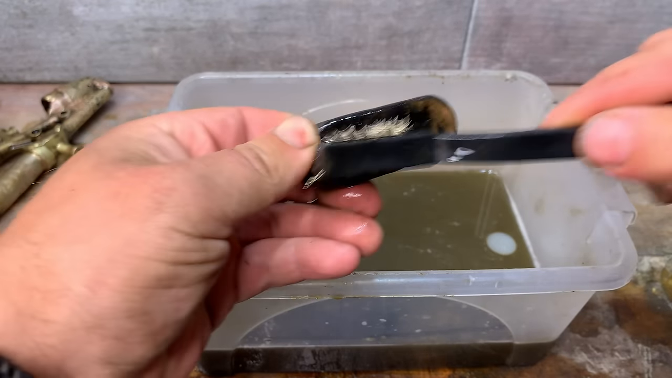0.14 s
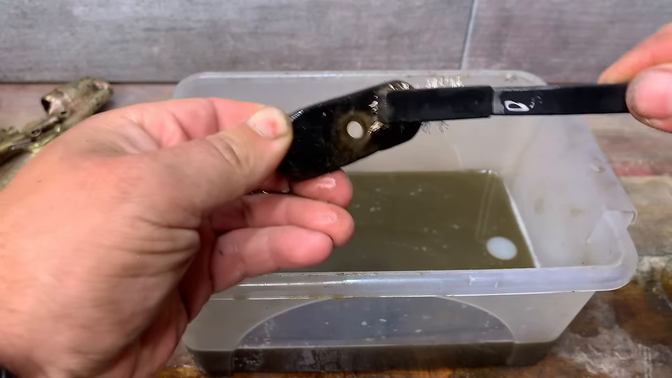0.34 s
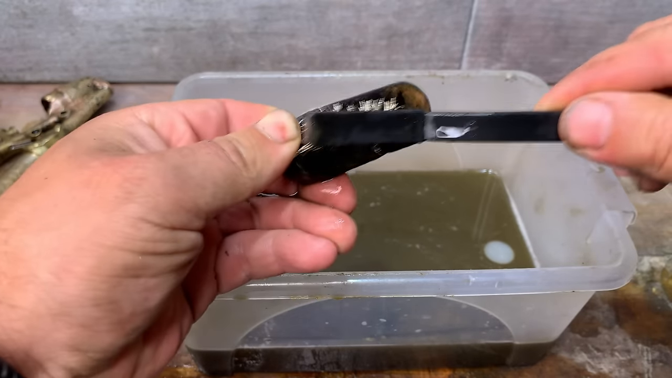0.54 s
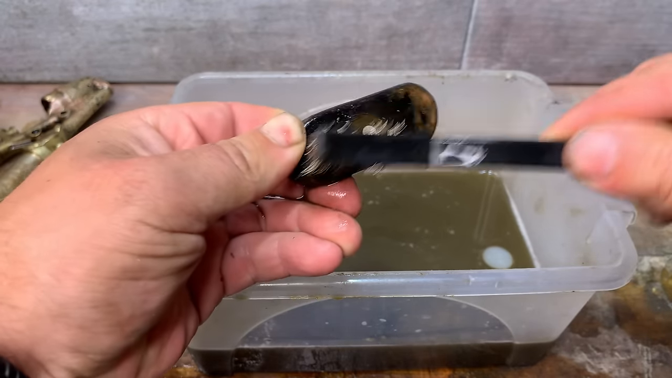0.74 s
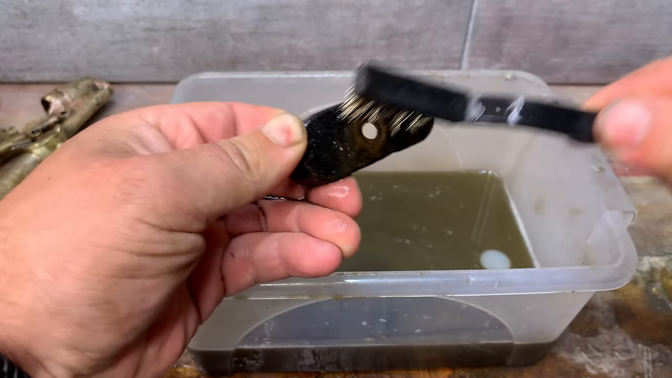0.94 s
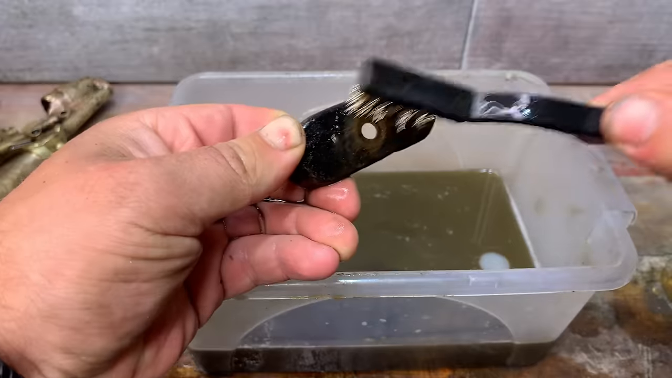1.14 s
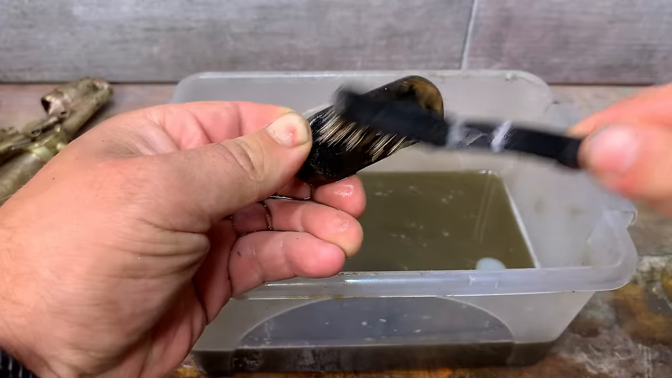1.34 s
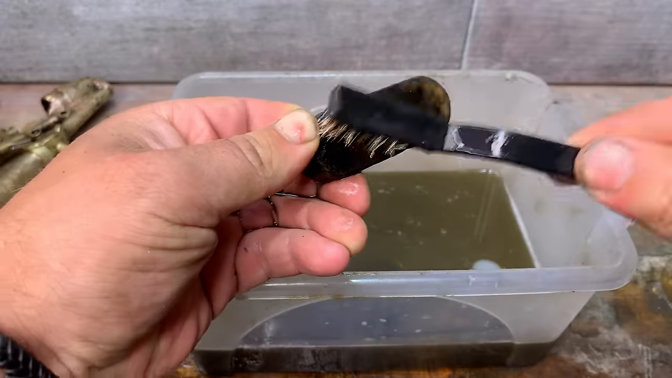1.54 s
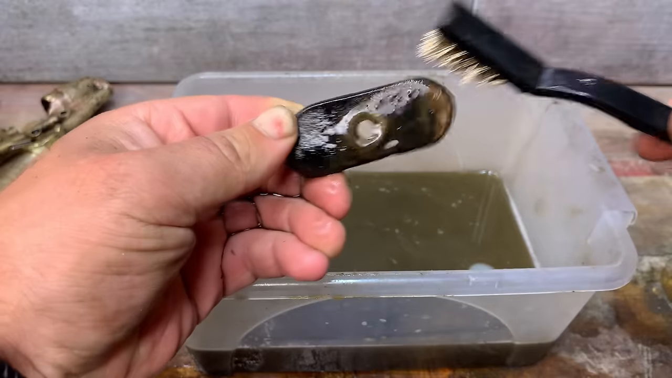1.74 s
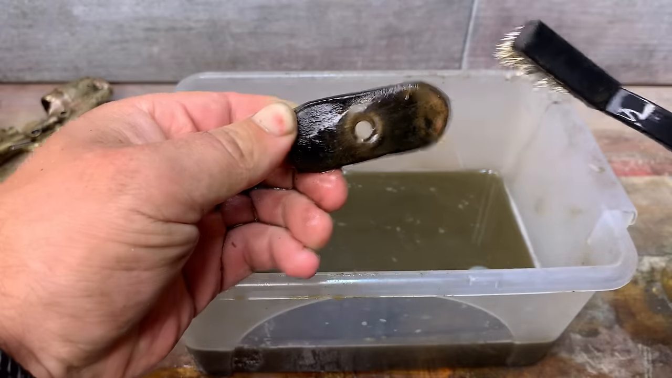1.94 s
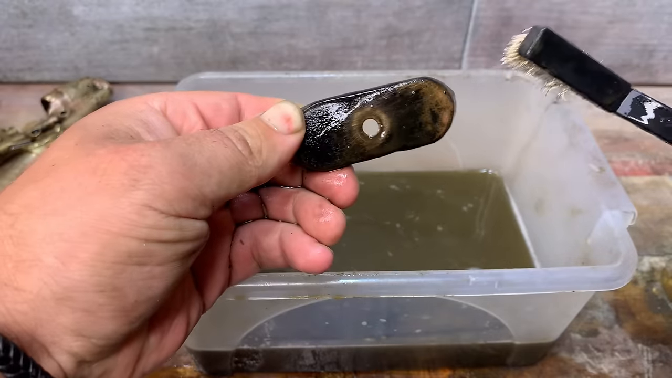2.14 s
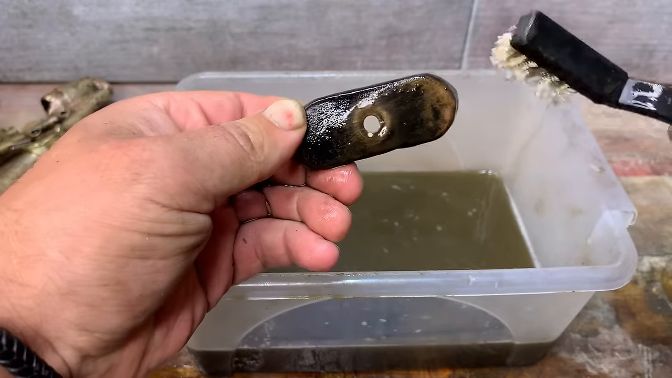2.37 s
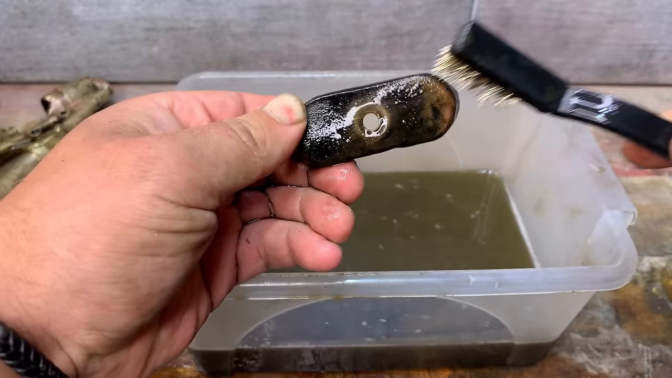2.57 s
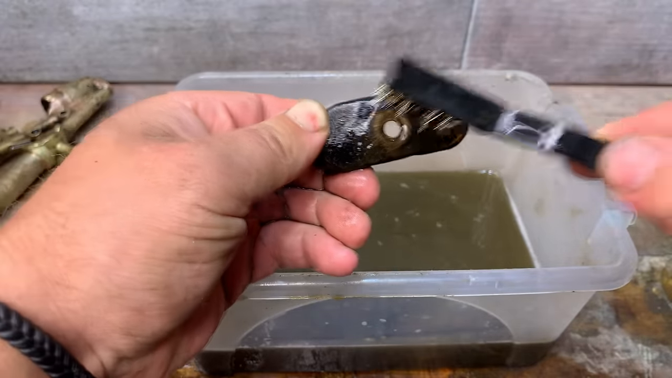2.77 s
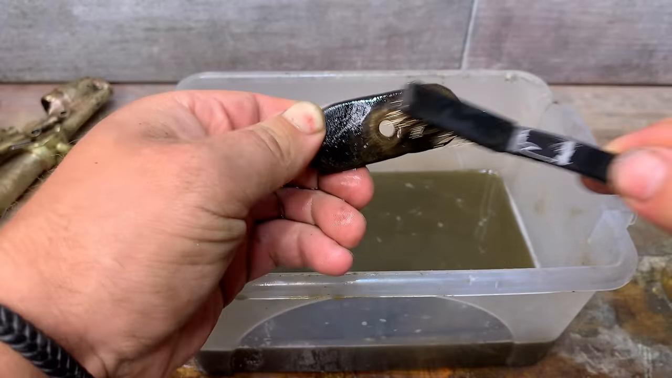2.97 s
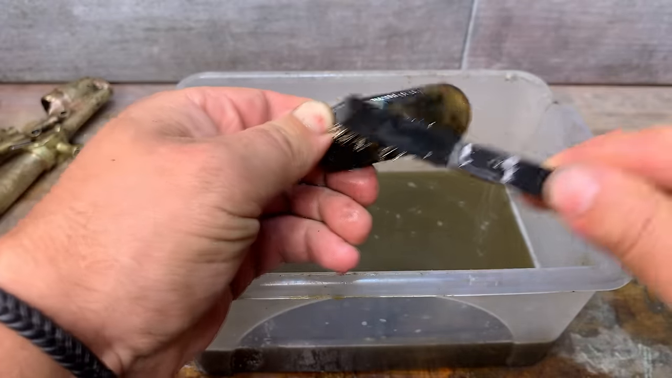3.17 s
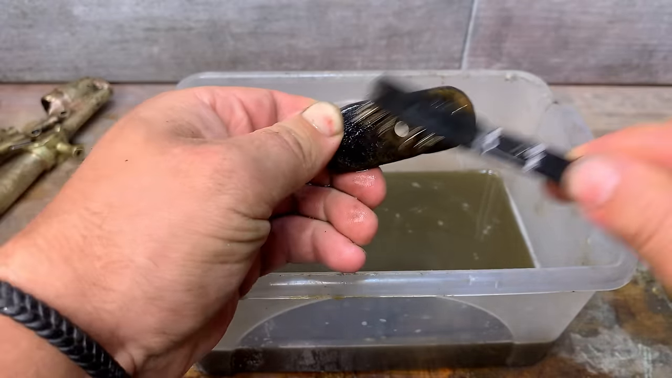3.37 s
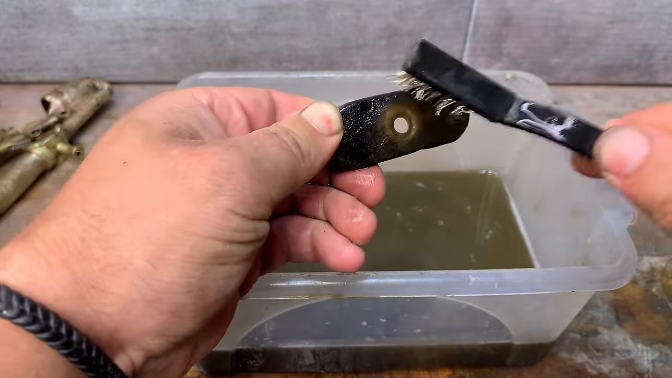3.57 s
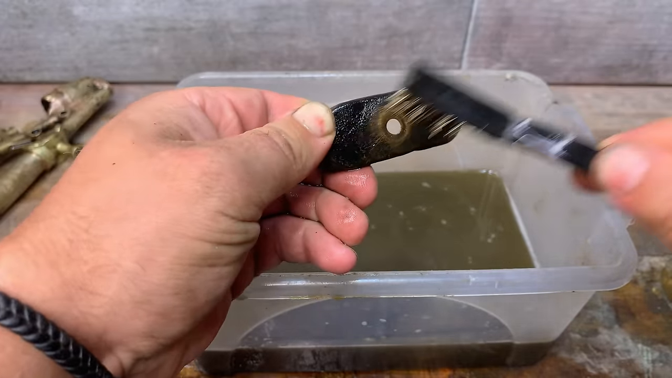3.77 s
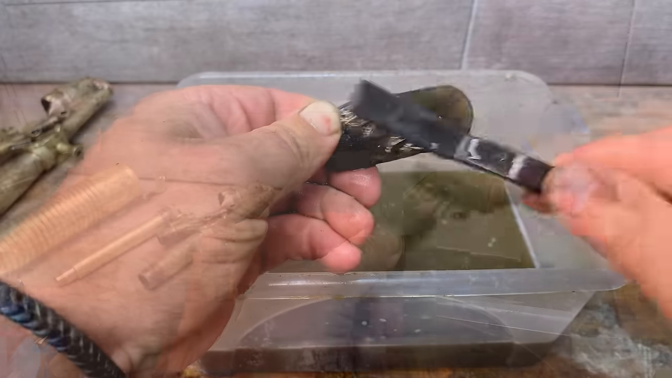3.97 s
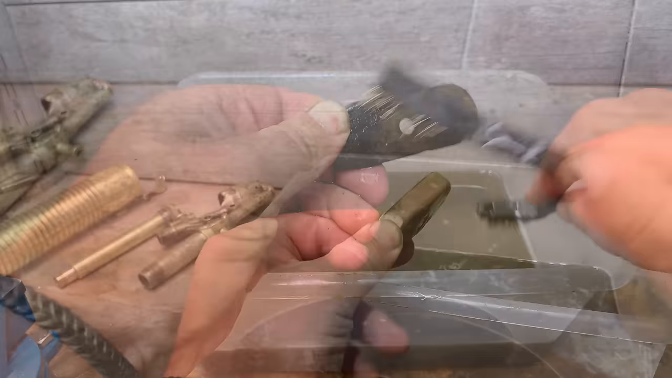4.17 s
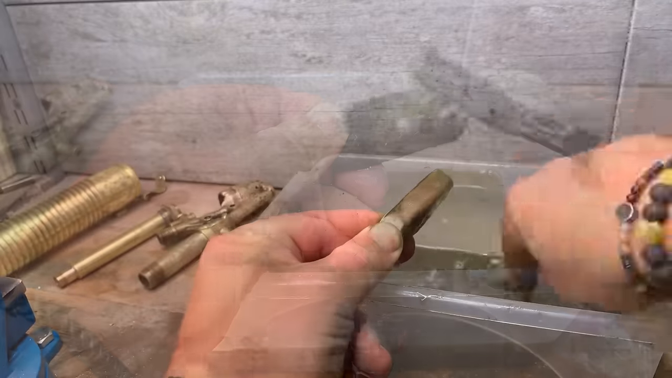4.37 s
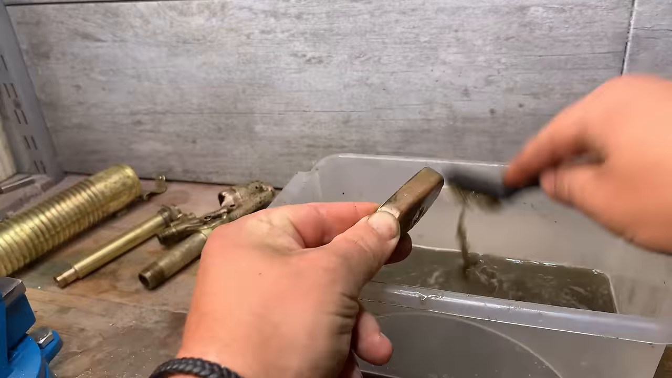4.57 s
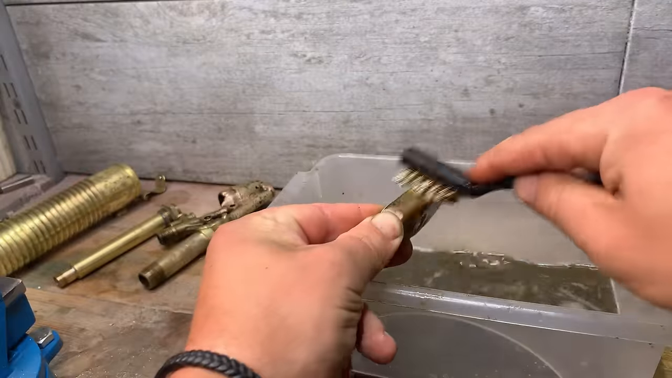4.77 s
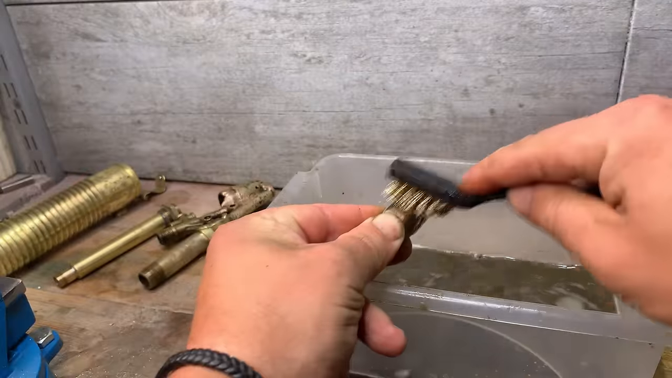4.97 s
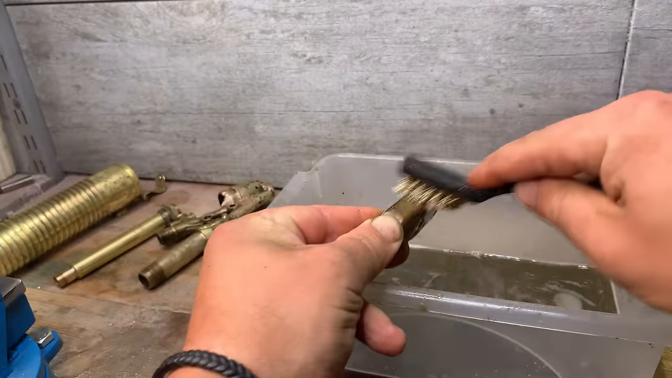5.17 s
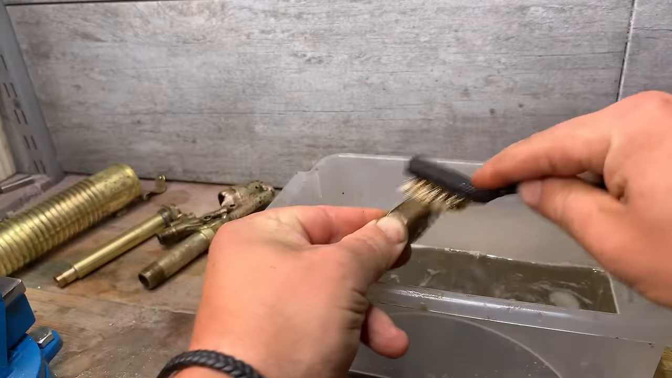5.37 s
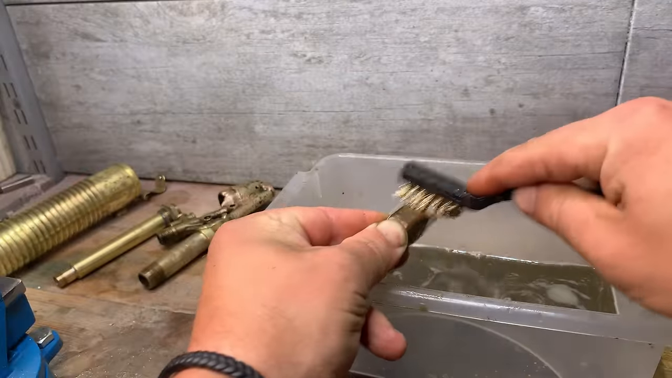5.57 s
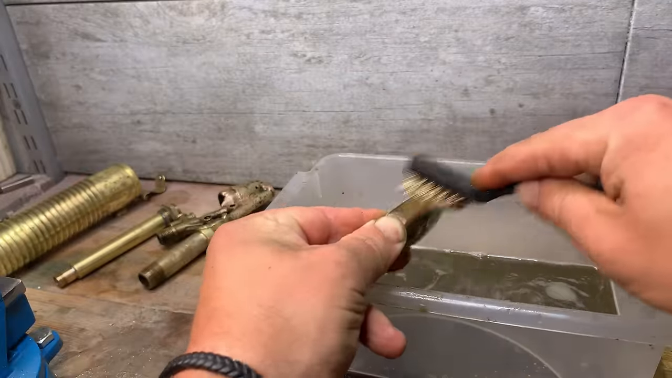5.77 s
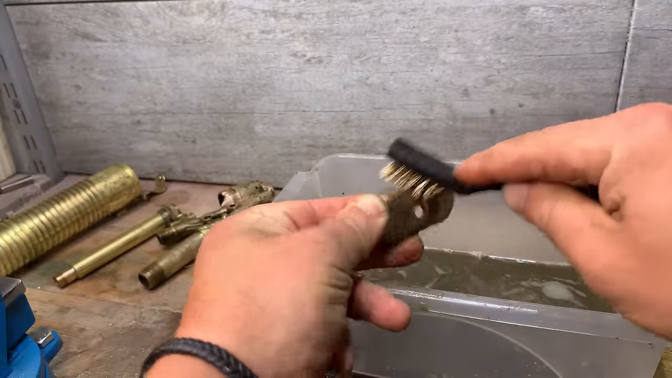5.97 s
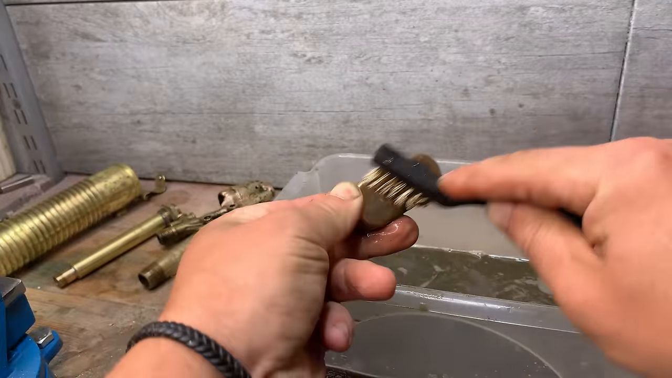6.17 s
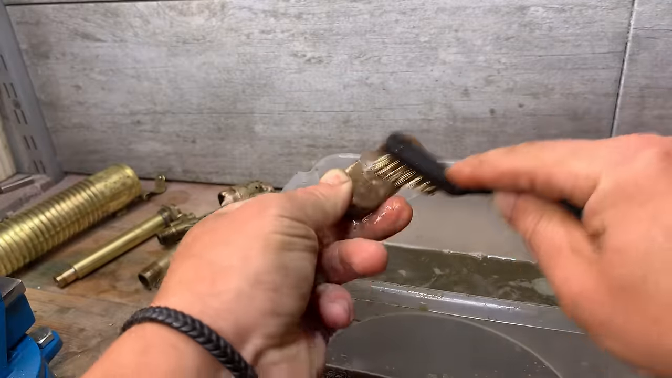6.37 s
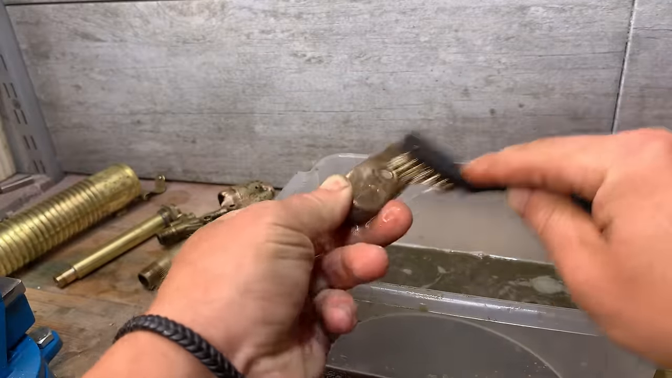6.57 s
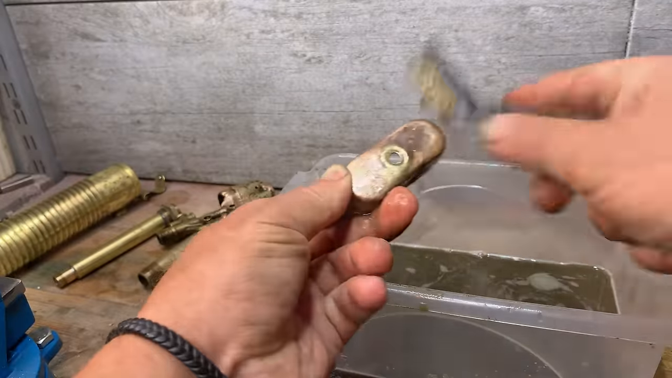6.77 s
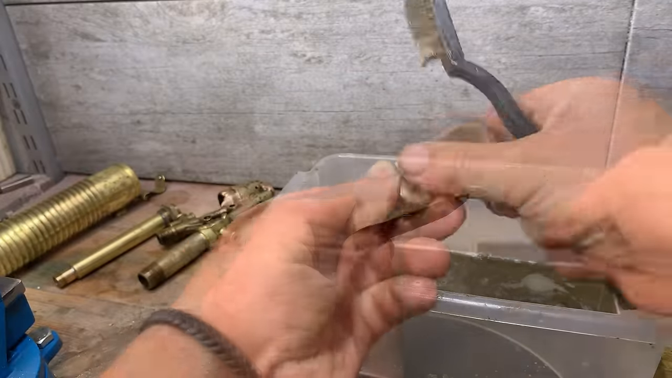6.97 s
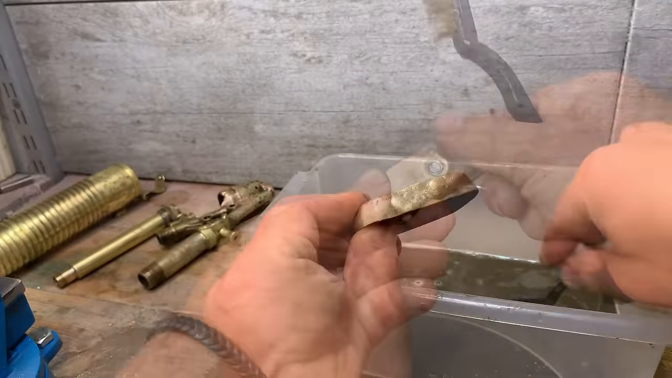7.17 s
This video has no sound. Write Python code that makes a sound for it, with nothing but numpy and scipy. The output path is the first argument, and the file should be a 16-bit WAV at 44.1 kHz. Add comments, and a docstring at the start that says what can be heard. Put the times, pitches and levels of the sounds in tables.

```python
"""Wire brush on a brass part

Close up in a quiet workshop, a small wire brush scrubs a hand-held brass part, first its face, then its end.
Noise of catching and flicking bristle tips, swelling with each stroke, rings the finger-damped brass modes.
Bumps ring a plastic tub in damped sines and set the bench rumbling; hands shuffle against it as filtered noise.
Something hollow is tapped twice, faint ticks fall, and air rushes softly; one close microphone, slightly wide."""
import sys
import numpy as np
from scipy import signal
from scipy.fft import rfft, irfft, next_fast_len
from scipy.io import wavfile
from scipy.ndimage import uniform_filter1d, map_coordinates

SR = 44100
rng = np.random.default_rng(int(sys.argv[2]) if len(sys.argv) > 2 else 0)


def int16_out(signal):
    """Quantize to a 16-bit WAV file."""
    q = np.round(np.clip(np.atleast_2d(signal).T, -1, 1) * 32767)
    wavfile.write(sys.argv[1], SR, q.astype(np.int16))


def invert_db(x):
    """Field ratio 10**(x/20) for x, a level in decibels (scalar or array-like)."""
    u = np.asarray(x, float) / 20
    return 10 ** u


N = 318291  # length in samples

# Rush of air, spectrum: freq_hz, level_db
AIR_SPECTRUM = [(25, -11.5), (84, -7.5), (206, -6), (300, -13), (6380, -23), (13000, -28.5), (15500, -37),
                (16000, -47.5)]
# Reverberation of the workshop: freq_hz, t60_s
SHOP_DECAY = [(200, .14), (3000, .2), (12000, .1)]
# Faint lone ticks: start_s, level_db, pitch_hz
TICKS = [(1.8756, -56, 2650), (1.906, -59, 2820), (2.3328, -54.5, 6350), (6.985, -54.5, 4650),
         (7.128, -51, 1380)]
# Hands and brush shuffling against the tub: time_s, level_db
SHUFFLE_LEVEL = [(4.2, -102), (4.37, -53.5), (4.5, -58), (4.65, -76.5), (4.93, -63), (5.15, -71.5),
                 (5.28, -61.5), (5.6, -57), (5.92, -72), (6.2, -83), (6.95, -72.5), (7.07, -63.5),
                 (7.2, -67)]
# Dry taps on something hollow nearby: start_s, level_db
TAPS = [(6.994, -29.5), (7.145, -30)]
# Modes of the hollow thing: pitch_hz, level_db (relative), t60_s
HOLLOW_MODES = [(162.6, -7.5, 0.15), (390, -0.5, 0.19), (520, -5, 0.08), (824, 4, 0.0765),
                (1116, -6.5, 0.13), (1540, -1.5, 0.055), (2460, -21, 0.036), (3140, -4, .025)]
# Bumps of the tub: start_s, level_db, sharpness_hz (higher for a harder contact)
BUMPS = [(4.059, -18, 1010), (4.353, -43, 500), (4.4, -28.5, 2000), (4.421, -29.5, 1540),
         (4.445, -39, 2530), (4.466, -40.5, 350), (4.517, -42.5, 1360), (4.695, -45, 4470),
         (5.234, -45, 400), (5.264, -49, 400), (5.367, -61, 400), (5.414, -45.5, 400), (5.508, -33, 577),
         (5.619, -36.5, 200), (5.679, -48.5, 397), (5.83, -27.5, 520), (6.623, -36, 450),
         (6.873, -46.5, 380)]
# Modes of the tub: pitch_hz, level_db (relative), t60_s
TUB_MODES = [(64.6, -8.5, 0.13), (101.4, -8.5, 0.13), (176, -5.5, 0.12), (247.4, -3.5, 0.057),
             (323.7, 2.5, 0.046), (384.3, -1, 0.077), (513, 6, 0.039), (782, 0, 0.04),
             (1180, -13.5, 0.0474), (1316, -8, 0.083), (1352, -2, 0.015)]
# Bench rumble, spectrum: freq_hz, level_db (relative)
BENCH_SPECTRUM = [(45, -50.5), (72, 2.5), (105, -2.5), (170, -13.5), (380, -9.5), (700, -30.5)]
# Bench rumble after a bump of -37 dB: sharpness_hz, level_db
RUMBLE_LEVEL = [(400, -50), (1500, -57.5), (4000, -64)]
# Brush strokes, each lasting to the next turn or lift:
# turn_s, fastest_s, fastest_level_db (relative), turn_level_db (relative)
STROKES = [(0.027, 0.134, -21.5, -67.5), (0.195, 0.264, -22, -44), (0.373, 0.486, -19.5, -37),
           (0.551, 0.602, -23, -42.5), (0.669, 0.724, -19, -43.5), (0.803, 0.845, -20.5, -41.5),
           (0.917, 1.005, -22, -40), (1.046, 1.134, -21.5, -39.5), (1.192, 1.277, -21.5, -40),
           (1.314, 1.379, -19, -45.5), (1.445, 1.545, -24, -37.5), (1.574, 1.63, -25.5, -45.5),
           (2.67, 2.705, -55, -62), (2.719, 2.74, -44.5, -56), (2.764, 2.83, -23.5, -48),
           (2.882, 2.957, -22, -35.5), (3.029, 3.124, -19, -36), (3.166, 3.241, -20, -43.5),
           (3.322, 3.395, -19.5, -38.5), (3.448, 3.503, -21.5, -46), (3.588, 3.649, -24, -44),
           (3.718, 3.765, -21.5, -30.5), (3.841, 3.922, -23.5, -37.5), (3.977, 4.052, -26.5, -34),
           (4.117, 4.198, -27.5, -45), (4.249, 4.333, -30, -39), (4.385, 4.432, -38, -50),
           (4.651, 4.664, -33.5, -48), (4.715, 4.733, -32, -54), (4.76, 4.802, -27.5, -45),
           (4.862, 4.899, -22, -39), (4.963, 5.024, -27, -42.5), (5.062, 5.121, -25, -39.5),
           (5.161, 5.205, -24, -37.5), (5.239, 5.302, -20, -39.5), (5.325, 5.411, -25, -39),
           (5.436, 5.496, -23, -37), (5.539, 5.565, -25.5, -39), (5.577, 5.62, -26.5, -30),
           (5.627, 5.709, -24.5, -42.5), (5.724, 5.794, -23, -43), (5.852, 5.889, -24, -35.5),
           (5.977, 6.028, -28, -40.5), (6.07, 6.113, -27, -46.5), (6.182, 6.227, -27, -42),
           (6.272, 6.342, -29.5, -39.5), (6.355, 6.412, -26.5, -43.5), (6.459, 6.506, -19, -38.5),
           (6.524, 6.614, -26.5, -34), (6.706, 6.792, -44.5, -66)]
# Moments when the brush leaves the brass: time_s
LIFTS = [1.774, 4.592, 6.698, 6.845]
# Tufts snapping off an edge: start_s, level_db (relative)
SNAPS = [(0.395, -10.5), (0.558, -18), (0.5811, -13), (0.8168, -7.5),  (1.5232, -9), (1.5813, -14),
         (1.742, -29.5), (2.6288, -51), (2.638, -51.5), (2.6442, -40.5), (2.6876, -24.5), (2.702, -33),
         (2.7254, -18.5), (2.738, -33), (2.7434, -18.5), (2.7565, -23), (2.7794, -26.5), (2.9066, -11.5),
         (2.931, -8.5), (3.665, -6.5), (4.661, -14), (4.7205, -18.5), (4.755, -24), (4.784, -20),
         (5.152, -13), (5.239, -19), (5.2616, -12), (5.463, -13), (5.6635, -10.5), (5.9485, -7),
         (6.4752, -27), (6.4935, -1.5), (6.662, -18), (6.786, -28), (6.821, -26)]
# Grip: time_s, fizz_db (tips over the ring of the brass), body_db (handle and hand over the ring),
# pull_loss_db (body lost on pull strokes)
GRIP = [(0.13, -6, 2, 7), (.4, -3.5, -2.5, 2), (1.599, -2, 7, 9), (2.701, 8.5, 27.5, -3),
        (2.83, -5, -1.5, 0.5), (3.5, -1, 1.5, 0.5), (4.3, -1.5, 5, 0), (4.74, -6.5, 9, 6),
        (4.82, 4, 9.5, 2.5), (5.2, 1, 6, -1), (6.1, 1.5, 16, 4), (6.32, 1.5, 3, -8), (6.5, 1, 8, 4)]
# How loosely the fingers let the brass ring: time_s, level_db (relative)
FINGER_FREEDOM = [(4.6, 4), (4.7, -5), (5.9, 0.5), (6.3, 0.5)]
# Scrape colour along the face and over the end: freq_hz, level_db (relative)
FACE_COLOUR = [(150, -36.5), (300, -34.5), (560, -41.5), (760, -29), (1000, -34.5), (1500, -34.5),
               (2100, -32.5), (2700, -25), (3700, -12.5), (5500, -12.5), (7000, -11.5), (9400, -9.5),
               (14000, -8.5), (16000, -7)]
END_COLOUR = [(200, -36.5), (370, -33.5), (600, -41), (1050, -39.5), (1330, -35.5), (2650, -27.5),
              (3600, -5.5), (5000, -7.5), (9000, -5.5), (14300, 1), (16000, -5.5)]
# Brass resonances fed along the face and over the end: pitch_hz, level_db (relative)
FACE_MODES = [(3880, -3), (4120, -2.5), (4270, -12), (4840, -7.5), (5450, -11.5), (6250, -14), (7890, -10),
              (8750, -10), (10400, -6.5), (11100, -10), (12600, -7.5), (13150, -7.5), (14100, -6)]
END_MODES = [(3630, -4.5), (4200, -4.5), (4950, -7), (6250, -10), (8520, -12), (10700, -12), (12600, -17.5),
             (14300, -18.5)]


def unit(x):
    """Scaled to rms 1."""
    return x / np.sqrt(np.mean(x ** 2) + 1e-20)


def along(points, hz):
    """Value at hz, read between (Hz, value) points on a log axis."""
    f, v = np.transpose(points)
    return np.interp(np.log(hz + 1), np.log(f + 1), v)


def curve(s, value):
    """One value per sample, in straight lines between the given times."""
    return np.interp(np.arange(N) / SR, np.maximum.accumulate(s), value)


def wobble(rate):
    """A smooth random curve with rate knots a second."""
    knots = rng.standard_normal(int(N * rate / SR) + 4)
    return map_coordinates(knots, [np.arange(N) * rate / SR])


def filtered(x, response):
    """The sound x shaped by a complex response of frequency."""
    m = next_fast_len(N + SR // 2)
    return irfft(rfft(x, m) * response(np.fft.rfftfreq(m, 1 / SR)), m)[..., :N]


def colour(spectrum):
    """Response of (Hz, dB) points, closing towards 5 Hz below the first."""
    return lambda hz: invert_db(along([(5, -90)] + spectrum, hz))


def resonance(hz, centre_hz, width_hz):
    """Response of one damped mode, 1 at its centre."""
    damping = 1j * hz * width_hz
    return damping / (centre_hz ** 2 - hz ** 2 + damping)


def air():
    """Faint steady rush: noise with the spectrum of the air."""
    return unit(filtered(rng.standard_normal(N), colour(AIR_SPECTRUM)))


def shop(x):
    """The room's answer: a noise tail in which each frequency dies at its own speed."""
    hz, t, z = signal.stft(rng.standard_normal(SR // 2), SR, nperseg=256)
    decay = invert_db(-60 * t / along(SHOP_DECAY, hz)[:, None])
    tail = signal.istft(z * decay, SR, nperseg=256)[1]
    delayed = np.pad(x, (200, 0))  # samples before the room answers
    return signal.fftconvolve(delayed, tail / np.linalg.norm(tail))[:N]


def ticks():
    """Each tick is a few damped cycles, roughened by noise."""
    out, t = np.zeros(N + SR), np.arange(SR // 20) / SR
    for s, db, hz in TICKS:
        rough = 1 + 0.65 * rng.standard_normal(len(t))
        tick = invert_db(db - 60 * t / 0.0098) * np.sin(2 * np.pi * hz * t) * rough
        out[round(s * SR):][:len(t)] += tick
    return out[:N]


def shuffle():
    """Soft, lumpy rubbing heard through the lower modes of the tub."""
    def walls(f):
        modes = sum(invert_db(db) * resonance(f, c, 3 / t60) for c, db, t60 in TUB_MODES)
        return modes / (1 + (f / 460) ** 6)

    lumpy = invert_db(3.5 * wobble(30)) * rng.standard_normal(N)
    rub = unit(filtered(lumpy, walls))
    return invert_db(curve(*np.transpose(SHUFFLE_LEVEL))) * rub


def taps():
    """A tap on something hollow: a dull noise crack and a short, fluttering ring of its modes."""
    crack_db, crack_t60_s, flutter_depth = -9, 0.03, 0.45
    out, t = np.zeros(N + SR), np.arange(SR // 3) / SR
    hz, mode_db, t60 = np.transpose(HOLLOW_MODES)[:, :, None]
    band = signal.butter(4, [400, 3500], "band", fs=SR)
    for s, db in TAPS:
        noise = rng.standard_normal((len(hz), len(t)))
        flutter = 1 + flutter_depth * unit(uniform_filter1d(noise, size=300))
        modes = flutter * invert_db(mode_db - 60 * t / t60) * np.sin(2 * np.pi * hz * t)
        ring = modes.sum(axis=0)
        crack = unit(signal.lfilter(*band, rng.standard_normal(len(t))))
        sound = ring / np.abs(ring).max() + crack * invert_db(crack_db - 60 * t / crack_t60_s)
        onset = 1 - np.exp(-t / 0.0013)
        out[round(s * SR):][:len(t)] += invert_db(db) * sound * onset
    return out[:N]


def tub():
    """Each bump cracks, rings the tub roughly and sets the bench rumbling; a soft contact has few highs."""
    out, after, t = np.zeros(N + SR), np.zeros(N + SR), np.arange(SR // 3) / SR
    hz, mode_db, t60 = np.transpose(TUB_MODES)[:, :, None]
    luck = rng.standard_normal((len(BUMPS), len(TUB_MODES), 2, 1)).transpose(0, 2, 1, 3)
    noise = rng.standard_normal((len(BUMPS), 2, len(t)))
    for (s, db, sharp_hz), (strength, detune), (dust, buzz) in zip(BUMPS, luck, noise):
        # a sharp tap barely moves the low modes
        contact = 1 / (1 + (hz / sharp_hz) ** 3) / (1 + (sharp_hz / hz / 7) ** 2)
        swing = np.sin(2 * np.pi * hz * (1 + 0.019 * detune) * t)
        modes = contact * invert_db(mode_db + 2 * strength - 60 * t / t60) * swing
        build_up = 1 - np.exp(-t * hz * 0.53)  # low modes take longer
        ring = (modes * build_up).sum(axis=0)
        band = signal.butter(4, [200, np.clip(1.36 * sharp_hz, 300, 9000)], "band", fs=SR)
        fade = invert_db(-12.5 - 60 * t / 0.014) + invert_db(-17.5 - 60 * t / 0.16)
        crack = unit(signal.lfilter(*band, dust)) * fade * (1 - np.exp(-t * sharp_hz))
        # loose walls flutter
        rattle = 1 + 0.49 * unit(uniform_filter1d(buzz, size=150)) * (1 - np.exp(-t / 0.0055))
        out[round(s * SR):][:len(t)] += invert_db(db) * (rattle * ring / np.abs(ring).max() + crack)
        rumble_db = along(RUMBLE_LEVEL, sharp_hz) + db + 37
        swell = 1 - np.exp(-(t / 0.019) ** 2)
        after[round(s * SR):][:len(t)] += invert_db(rumble_db - 60 * t / 0.31) * swell
    bench = filtered(rng.standard_normal(N), colour(BENCH_SPECTRUM))
    rumble = unit(invert_db(0.78 * wobble(32)) * bench)
    return out[:N] + after[:N] * rumble


def strokes():
    """Level in dB, rounding up from each turn to the fastest point and down again; and 1 on pull strokes."""
    speed_up, slow_down = 2.18, 2.16  # roundness of the swell before and after the fastest point (power)
    lift_db = -70  # last bristles leaving the brass
    turn, fastest, peak_db, turn_db = np.transpose(STROKES)
    stops = np.append(turn, LIFTS)
    after = np.where(stops > fastest[:, None], stops, np.inf).argmin(axis=1)
    stop = stops[after]
    stop_db = np.append(turn_db, np.full(len(LIFTS), lift_db))[after]
    t = np.arange(N) / SR
    k = np.clip(np.searchsorted(turn, t) - 1, 0, None)  # the stroke under way
    early = np.clip((fastest[k] - t) / (fastest - turn)[k], 0, None) ** speed_up
    late = np.clip((t - fastest[k]) / (stop - fastest)[k], 0, None) ** slow_down
    level_db = peak_db[k] - (peak_db - turn_db)[k] * early - (peak_db - stop_db)[k] * late
    pull = uniform_filter1d(k % 2 * 1., size=1500)  # every other stroke
    return np.maximum(level_db, -120), pull


def catches(rate, steady):
    """Gain near rms 1: tufts let go suddenly at random moments and fade, over a steady share of sliding tips."""
    fade_s = 0.004  # time constant
    hit, size = rng.random((2, N))
    releases = (hit < rate / SR) * -np.log(size + .06)
    jumps = unit(signal.lfilter([1], [1, -np.exp(-1 / (fade_s * SR))], releases))
    return (jumps + steady) / np.sqrt(1 + steady ** 2 + 2 * steady * jumps.mean())


def flicks(rate, spread_db, hiss):
    """Random bristle flicks, mostly small and a few large, over the hiss of tips that slide."""
    hit, size, sign = rng.random((3, N))
    clicks = (hit < rate / SR) * invert_db(-spread_db * np.log(size + .01)) * np.sign(sign - .5)
    return unit(unit(clicks) + hiss * rng.standard_normal(N))


def patchy(x, depth_db):
    """Each tuft meets the brass at another spot, so the colour shifts from moment to moment."""
    z = signal.stft(x, nperseg=256)[2]
    across_pitch = uniform_filter1d(rng.standard_normal(z.shape), size=6, axis=0)
    field = uniform_filter1d(across_pitch, size=8, axis=1)
    return signal.istft(z * invert_db(depth_db * unit(field)), nperseg=256)[1][:N]


def brass(force, scrape, modes):
    """Broad scrape colour plus the resonances of the part, each fed more or less as the brush travels over it."""
    sharpness = 36  # centre over width of each resonance
    out = filtered(force, colour(scrape))
    freedom = invert_db(curve(*np.transpose(FINGER_FREEDOM)))
    for c, db in modes:
        place = invert_db(db + 1.7 * wobble(18))

        def mode(f):
            return resonance(f, c, c / sharpness) / (1 + (3000 / (f + 1)) ** 8)  # no ring in the lows

        out += filtered(force * freedom * place, mode)
    return out


def snaps():
    """Tufts snapping off an edge: sudden bursts of noise that die in milliseconds."""
    t60_s = 0.018
    level, t = np.zeros(N), np.arange(SR // 30) / SR
    for s, db in SNAPS:
        level[round(s * SR):][:len(t)] += invert_db(db - 60 * t / t60_s)
    return level * rng.standard_normal(N)


def brush():
    """Stroke speed sets the level; tufts catch in bunches and snap off edges, driving the brass."""
    regrip_s = 4.62  # from the face to the end
    speed_db, pull = strokes()
    steady = np.interp(speed_db, [-45, -25], [.6, 2.1])  # a light touch breaks up into single tufts
    drive = invert_db(speed_db - 1) * catches(240, steady)
    s, fizz_db, body_db, pull_db = np.transpose(GRIP)
    shared = flicks(3500, spread_db=3, hiss=.6)
    tips = unit(shared + 3.2 * flicks(8300, spread_db=5.0, hiss=1.3))
    fizz = tips * invert_db(curve(s, fizz_db) + 0.31 * wobble(50))
    body = rng.standard_normal(N) * invert_db(curve(s, body_db) - pull * curve(s, pull_db))

    def low(f):
        return 1 / (1 + (f / 2500) ** 8)

    def high(f):
        return 1 / (1 + (7000 / (f + 1)) ** 6)

    force = filtered(drive * shared, lambda f: 1 - low(f) - high(f))
    force += filtered(drive * fizz, high)
    force += filtered(invert_db(speed_db) * body, low)
    force = patchy(force, depth_db=2.3)
    force += invert_db(-10) * filtered(snaps(), lambda f: 1 - .8 * low(f))
    first = np.arange(N) < regrip_s * SR
    face = invert_db(8.5) * brass(force * first, FACE_COLOUR, FACE_MODES)
    end = invert_db(5.0) * brass(force * ~first, END_COLOUR, END_MODES)
    return face + end


def scene():
    """Brush and tub close to the microphone, in the room over a faint rush of air, a trace wider than mono."""
    air_db, air_side_db, room_db, room_side_db = -67.5, -77, -18, -35.5
    near = brush() + tub() + taps() + shuffle() + ticks()
    near = filtered(near, lambda f: 1 / (1 + (50 / (f + 1)) ** 6))  # small things move no deep bass
    mid = near + invert_db(room_db) * shop(near) + invert_db(air_db) * air()
    side = invert_db(air_side_db) * air() + invert_db(room_side_db) * shop(near)
    return np.array([mid + side, mid - side])


def roll_off(x):
    """The treble ends steeply here."""
    return signal.sosfilt(signal.butter(12, 16490, fs=SR, output="sos"), x)


def record(dry):
    """A steep band limit closes the treble over the last 200 Hz below top_hz."""
    top_hz = 15880
    mix = filtered(dry, lambda hz: np.clip((top_hz - hz) / 200, 0, 1) ** 2)
    return roll_off(mix)


dry = scene()
out = record(dry)
int16_out(out)
```